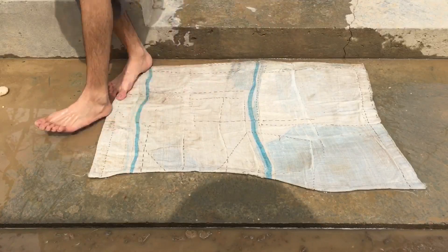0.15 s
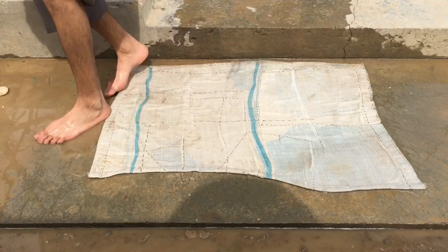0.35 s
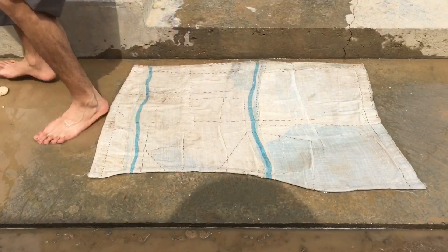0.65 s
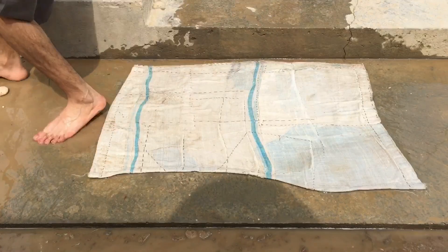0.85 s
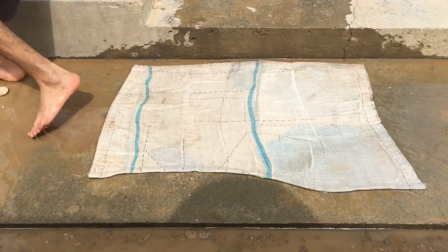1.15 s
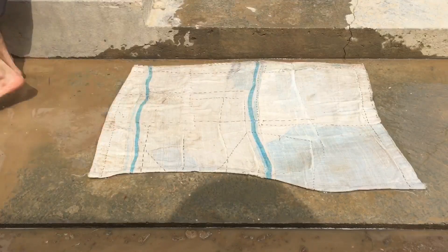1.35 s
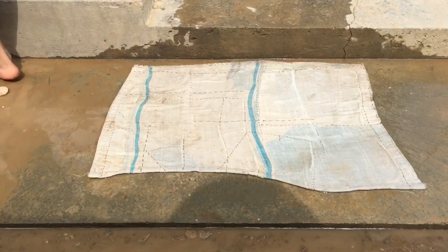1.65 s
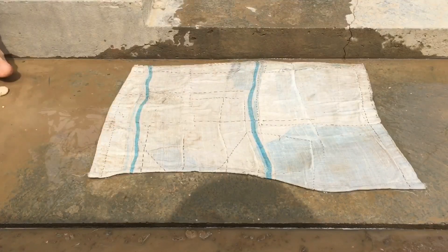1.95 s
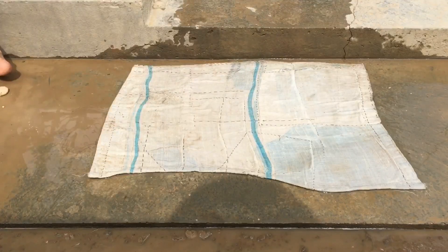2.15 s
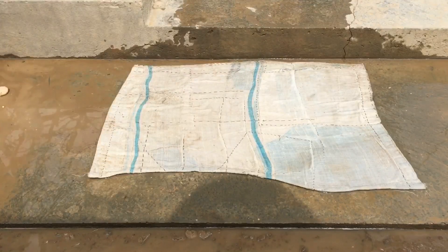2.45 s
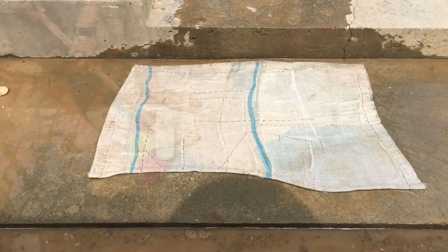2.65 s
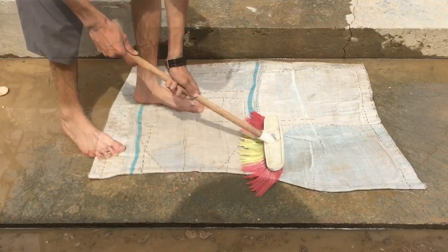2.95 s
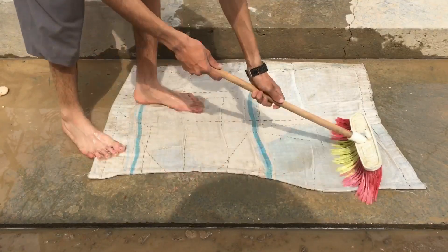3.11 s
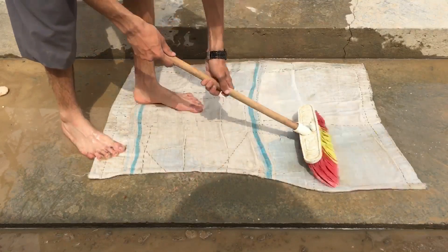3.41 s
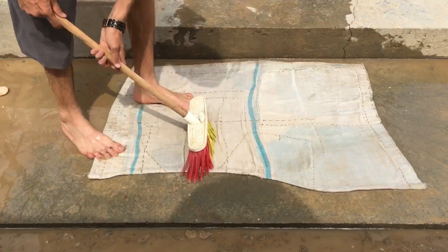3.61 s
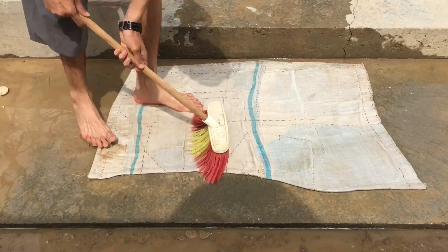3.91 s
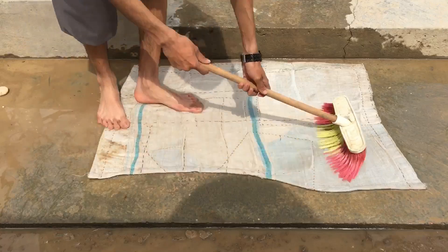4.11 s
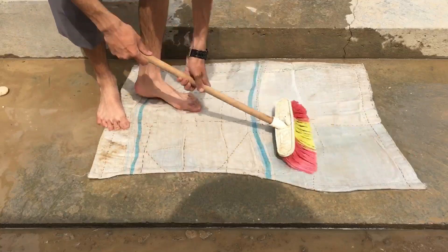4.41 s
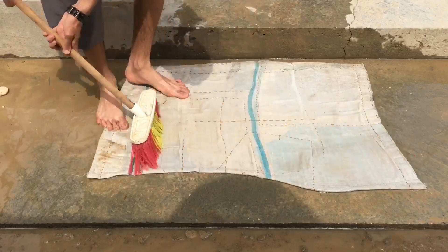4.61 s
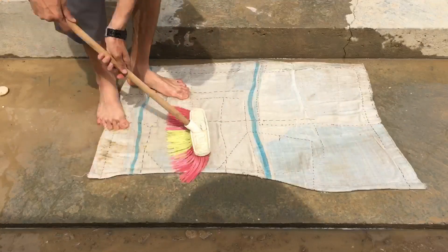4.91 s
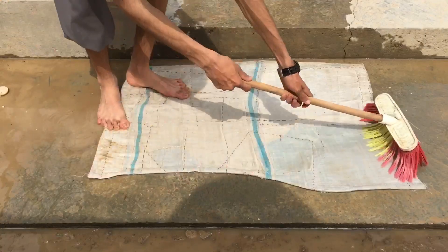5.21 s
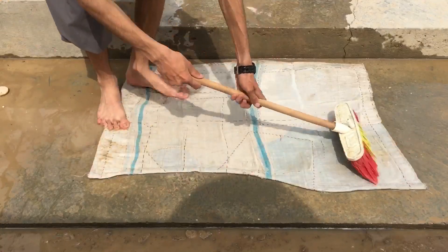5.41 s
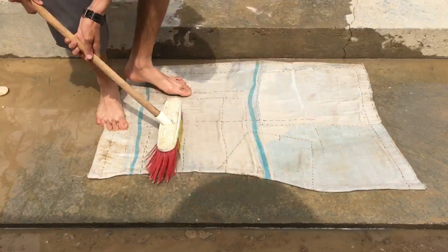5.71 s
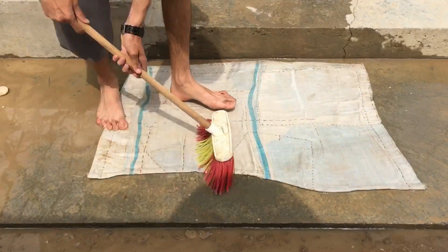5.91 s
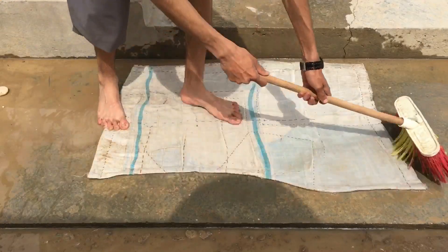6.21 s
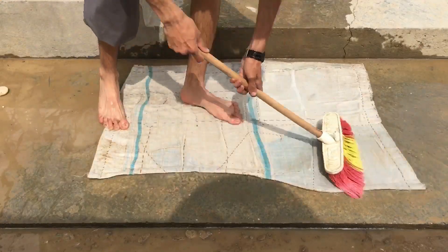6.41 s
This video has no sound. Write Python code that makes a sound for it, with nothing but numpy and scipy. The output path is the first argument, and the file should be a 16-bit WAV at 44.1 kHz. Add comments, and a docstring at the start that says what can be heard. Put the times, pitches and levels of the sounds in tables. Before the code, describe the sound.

Bare soles brush a wet floor, a wooden handle clacks, hollow plastic knocks, then a stiff broom scrubs a wet rug in steady strokes.

```python
"""A stiff broom scrubs a soapy rug on concrete, about two strokes a second: shaped grains and sliding noise bands.
Before it, bare soles brush the wet floor (soft grains), a broom handle clacks, a dull thud comes and a plastic
bucket is knocked (damped modes plus noise cracks), and drops fall back (rising sines). Light taps, mostly hollow,
are scattered throughout; wet ticks come until about 4.1 s. A breeze puffs on the microphone (low noise, pulses);
a far bird calls (fluttered sine) over a neighbourhood hum (filtered noise). Walls add a short tail and an echo."""
import sys
import numpy as np
from scipy import signal
from scipy.fft import rfft, irfft, next_fast_len
from scipy.io import wavfile
from scipy.ndimage import uniform_filter1d, map_coordinates

SR = 44100
rng = np.random.default_rng(int(sys.argv[2]) if len(sys.argv) > 2 else 0)


def dump_mix(stems):
    """Bounce the given channels to the path in sys.argv[1] as a 16-bit WAV at rate SR."""
    frames = np.atleast_2d(stems).T  # one column per channel
    limited = np.clip(frames, -1, 1)  # hard clip at full scale
    pcm = np.round(limited * 32767).astype(np.int16)
    wavfile.write(sys.argv[1], SR, pcm)


N = 289296
TIME_S = np.arange(N) / SR

# Spectrum of wet contact with the floor. Each row: frequency in Hz, relative level in dB.
WET_SPECTRUM = [(300, -1), (1800, 12.5), (3500, 7), (6000, 4), (15000, -6.5)]


def amp(db):
    """Decibels to gain."""
    return 10 ** (np.asarray(db) / 20)


def unit(x):
    """Scale to rms 1."""
    return x / np.sqrt(np.mean(x ** 2) + 1e-20)


def along(points, hz):
    """(Hz, value) points read on a log axis."""
    point_hz, values = np.transpose(points)
    return np.interp(np.log(hz + 1), np.log(point_hz), values)


def wobble(knots_per_s):
    """Smooth random curve through normally distributed knots."""
    knots = rng.standard_normal(int(N * knots_per_s / SR) + 4)
    return map_coordinates(knots, [np.arange(N) * knots_per_s / SR])


def filtered(x, response):
    """x times a response of frequency, zero-padded against wrap-around."""
    size = next_fast_len(len(x) + SR // 4)
    spectrum = rfft(x, size) * response(np.fft.rfftfreq(size, 1 / SR))
    return irfft(spectrum, size)[:len(x)]


def coloured(x, spectrum):
    """x shaped by (Hz, dB) points, at rms 1."""
    return unit(filtered(x, lambda hz: amp(along(spectrum, hz))))


def softened(x, edge_hz):
    """Causal low-pass, as from a soft contact."""
    return signal.lfilter(*signal.butter(2, min(edge_hz, SR / 2 - 1), fs=SR), x)


def grains(rate_per_s, spread_db):
    """Random impulses of uneven size, at rms 1."""
    hits = rng.random(N) < rate_per_s / SR
    sizes = rng.standard_normal(N) * amp(spread_db * rng.standard_normal(N))
    return unit(hits * sizes)


def patchy(x, depth_db, bins):
    """Random gain patches, some bins wide and about 30 ms long, at rms 1."""
    z = signal.stft(x, nperseg=256)[2]
    field = uniform_filter1d(rng.standard_normal(z.shape), bins, 0)
    field = uniform_filter1d(field, 10, 1)
    gain = amp(depth_db * unit(field))
    return unit(signal.istft(z * gain, nperseg=256)[1][:N])


def ring(modes, scatter_db):
    """Sum of damped modes, struck at slightly new strengths each time."""
    t = np.arange(SR // 4) / SR
    out = np.zeros(len(t))
    for k, (hz, db, t60_s) in enumerate(modes):
        level_db = db + scatter_db * rng.standard_normal() - 60 * t / t60_s
        out += (-1) ** k * amp(level_db) * np.sin(2 * np.pi * hz * t)
    return out


def burst(spectrum, t60_s):
    """Coloured noise under an exponential decay."""
    t = np.arange(SR // 4) / SR
    return coloured(rng.standard_normal(len(t)), spectrum) * amp(-60 * t / t60_s)


def add(track, start_s, sound):
    """Mix a sound into the track in place."""
    part = track[round(start_s * SR):][:len(sound)]
    part += sound[:len(part)]


def blows(rows, modes, crack_spectrum):
    """Each blow rings the modes and cracks at the contact, low-passed at its own brightness."""
    out = np.zeros(N)
    for start_s, ring_db, crack_db, crack_t60_s, contact_hz in rows:
        body = amp(ring_db) * ring(modes, scatter_db=1.5)
        crack = amp(crack_db) * burst(crack_spectrum, crack_t60_s)
        add(out, start_s, softened(body + crack, contact_hz))
    return out


def neighbourhood():
    """A distant wash of patchy filtered noise, its level drifting slowly."""
    # Far hum. Each row: frequency in Hz, relative level in dB.
    hum_spectrum = [(100, -7.5), (170, -8), (290, -7), (420, -10.5), (650, -8), (1050, -12.5), (1600, -18),
                    (2300, -24), (5000, -35), (15800, -39.5)]
    # Level of the hum. Each row: time in seconds, level in dB before the waver.
    hum_level = [(0, -57), (1, -59.5), (2.1, -59), (2.7, -65.5), (6.5, -61)]
    level_db = np.interp(TIME_S, *np.transpose(hum_level))
    waver_db = 0.7 * wobble(9)
    hum = coloured(rng.standard_normal(N), hum_spectrum)
    return amp(level_db + waver_db) * patchy(hum, depth_db=2.0, bins=3)


def breeze():
    """Small eddies bump the microphone, strongest in gusts; single eddies push and pull the pressure once."""
    # Gusts. Each row: start in seconds, length in seconds, level in dB before the lumps.
    gust_rows = [(1.02, 0.025, -44.5), (1.453, 0.064, -43.5), (1.75, 0.25, -41.5), (2.143, 0.215, -45),
                 (2.464, 0.16, -46.5), (2.868, 0.062, -45), (3.503, 0.18, -47), (4.144, 0.043, -37),
                 (4.238, 0.077, -34.5), (4.366, 0.23, -40.5), (4.692, 0.092, -33.5), (5.078, 0.15, -46.5),
                 (5.417, 0.29, -46), (5.915, 0.18, -47)]
    # Single eddies. Each row: start in seconds, relative level in dB, half width in seconds.
    puff_rows = [(1.45, -34.5, 0.0028), (1.792, -32, 0.0036), (4.263, -36, 0.0033), (4.5076, -19.5, 0.0024),
                 (4.752, -24.5, 0.0029), (5.197, -34, 0.0013)]
    # Wind on the microphone. Each row: frequency in Hz, relative level in dB.
    rumble_spectrum = [(25, -18.5), (48, 4.5), (72, -0.5), (120, -6), (200, -13.5), (350, -33), (600, -68)]
    calm_db, attack_s, release_s = -56, 0.012, 0.01

    strength = amp(calm_db + 2.45 * wobble(12))
    for start_s, length_s, db in gust_rows:
        attack = np.clip((TIME_S - start_s) / attack_s, 0, 1)
        release = np.exp(-np.maximum(TIME_S - start_s - length_s, 0) / release_s)
        strength = np.hypot(strength, amp(db) * attack * release)
    eddies = grains(rate_per_s=220, spread_db=1) + amp(-4.5) * rng.standard_normal(N)
    lumps_db = 1.5 * wobble(25)
    out = strength * amp(lumps_db) * coloured(eddies, rumble_spectrum)

    for start_s, db, half_s in puff_rows:
        u = (TIME_S[:SR // 10] - 0.008) / half_s  # centred 8 ms after the start
        add(out, start_s, amp(db + 9.0) * -u / (1 + u ** 2) ** 2)
    # the microphone sheds the slowest pressure changes
    return signal.lfilter(*signal.butter(2, 28, "high", fs=SR), out)


def taps():
    """Light hollow taps, and a bristle snap at 4.084 s given the same sound: damped modes with a noise burst."""
    # Taps and the snap. Each row: start in seconds, relative level in dB.
    tap_rows = [(0.151, -51), (0.457, -51), (2.765, -46.5), (4.084, -45), (5.2345, -40.5), (5.563, -41.5),
                (5.8083, -40), (5.9692, -42), (6.128, -41), (6.2875, -43.5), (6.4472, -45)]
    # Hollow modes. Each row: frequency in Hz, relative level in dB, t60 in seconds.
    tap_modes = [(1088, 6.5, 0.054), (1220, 2.5, 0.035), (1330, -4, 0.019), (1604, -3, 0.045)]
    knock_spectrum = [(800, -19), (1150, 10.5), (2200, -5), (6000, -13), (15000, -25)]
    out = np.zeros(N)
    for start_s, db in tap_rows:
        sound = ring(tap_modes, scatter_db=2) + burst(knock_spectrum, t60_s=0.076)
        add(out, start_s, amp(db - 7.0) * sound)
    return out


def feet():
    """Bare soles peel off the wet floor: dense grains in soft swells, a faint sizzle."""
    # Brushes of wet soles. Each row: middle in seconds, half length in seconds, level in dB.
    scuff_rows = [(0.323, 0.087, -68.5), (1.36, .05, -65.5)]
    strength = np.zeros(N)
    for middle_s, half_s, db in scuff_rows:
        strength += amp(db) * np.exp(-((TIME_S - middle_s) / half_s) ** 2)
    return strength * coloured(grains(rate_per_s=4600, spread_db=5.0), WET_SPECTRUM)


def ticks():
    """Wet ticks of soles, cloth and bristles: short noise bursts."""
    # Ticks. Each row: start in seconds, relative level in dB.
    tick_rows = [(0.271, -44), (0.296, -46), (0.822, -52), (1.706, -44.5), (1.727, -42), (2.581, -41.5),
                 (3.318, -71), (4.146, -32.5)]
    out = np.zeros(N)
    for start_s, db in tick_rows:
        add(out, start_s, amp(db - 9.5) * burst(WET_SPECTRUM, t60_s=0.048))
    return out


def bird():
    """A far beaded whistle: a fluttered sine with a weak octave, swelling and fading as its pitch arches."""
    # Slurred call. Each row: start in seconds, length in seconds, top pitch in Hz, level in dB before the swell.
    call_rows = [(.4, .52, 1506, -59)]
    slur_share, slur_top = 0.44, 0.46  # curvature of the arch; position of its top within the call
    out = np.zeros(N)
    for start_s, length_s, top_hz, db in call_rows:
        u = np.clip((TIME_S - start_s) / length_s, 0, 1)
        pitch_hz = top_hz * (1 - slur_share * (u - slur_top) ** 2)
        phase = 2 * np.pi * np.cumsum(pitch_hz * (1 + 0.02 * wobble(170))) / SR
        whistle = unit(np.sin(phase) + amp(-19.5) * np.sin(2 * phase))
        out += amp(db) * np.sin(np.pi * u) ** 2 * whistle
    flutter = 1 + 0.5 * np.sin(2 * np.pi * 24 * TIME_S + wobble(20))
    return flutter * out


def handle():
    """Wood clacks on wet concrete: a light double touch, then a hard blow with a snap and a little spray."""
    # Handle strikes. Each row: start in seconds, ring gain in dB, crack gain in dB, crack t60 in seconds,
    # contact low-pass in Hz.
    clack_rows = [(1.0214, -38.5, -36.5, 0.037, 2260), (1.0295, -40, -30, 0.038, 980),
                  (1.0784, -26, -20.5, 0.038, 14000)]
    # Modes of the wooden handle. Each row: frequency in Hz, relative level in dB, t60 in seconds.
    wood_modes = [(364, -2.5, 0.044), (573, -1.5, 0.037), (870, 2.5, 0.028), (1020, -3, 0.092),
                  (1330, -3, 0.022), (1437, -24.5, 0.6), (1725, 8.5, 0.02), (2743, -5.5, 0.013),
                  (3240, 3.5, 0.033), (3860, 4.5, 0.022), (5220, -2, 0.022), (6200, -7, 0.015),
                  (7900, -3, 0.026), (9180, -1.5, 0.018)]
    # Spray off the wet floor. Each row: frequency in Hz, relative level in dB.
    spray_spectrum = [(300, -25.5), (1000, 2), (1600, -12), (3000, -19), (6000, 1), (9500, -4.5),
                      (15000, -9.5)]
    crack_spectrum = [(100, -1.5), (900, -0.5), (2300, -4.0), (3400, -2.5), (5000, -10.5), (12000, -8),
                      (16000, -14)]
    snap_spectrum = [(500, -6.5), (3000, -8.5), (15000, -7.5)]
    out = blows(clack_rows, wood_modes, crack_spectrum)
    hard_s = clack_rows[-1][0]
    add(out, hard_s, amp(-8.5) * burst(snap_spectrum, t60_s=0.0055))
    add(out, hard_s, amp(-51) * burst(spray_spectrum, t60_s=0.26))
    return out


def drips():
    """Drops fall back after the hard clack; each traps a bubble that rings briefly with a rising pitch."""
    # Drops. Each row: start in seconds, first pitch in Hz, level in dB before the attack and decay.
    drip_rows = [(1.189, 1690, -35), (1.211, 5940, -49.5)]
    t60_s, rise_per_s = 0.024, 14  # pitch climbs by 14 times its first value a second
    t = np.arange(SR // 10) / SR
    attack = 1 - np.exp(-t / 0.002)
    out = np.zeros(N)
    for start_s, hz, db in drip_rows:
        phase = 2 * np.pi * hz * t * (1 + rise_per_s * t / 2)
        add(out, start_s, amp(db - 60 * t / t60_s) * attack * np.sin(phase))
    return out


def thud_and_bucket():
    """A dull thud, perhaps a footfall, then a strong hollow plastic knock and a faint rebound."""
    # Thud, knock and rebound. Each row: start in seconds, ring gain in dB, crack gain in dB,
    # crack t60 in seconds, contact low-pass in Hz.
    knock_rows = [(1.8948, -54, -32.5, 0.09, 3250), (2.1858, -16.5, -23.5, 0.078, 2530),
                  (2.249, -55, -33.5, 0.087, 2380)]
    # Modes of the hollow bucket. Each row: frequency in Hz, relative level in dB, t60 in seconds.
    bucket_modes = [(169.3, -10.5, 0.083), (355, -15.5, 0.085), (615, -0.5, 0.07), (920, -7, 0.063),
                    (1150, 4.5, 0.016), (1410, 1, 0.035), (1524, -8, 0.045), (1720, 2.5, 0.02),
                    (2050, -16, 0.06), (2590, -11.5, 0.022), (3330, -1, 0.014), (4260, -5, 0.013),
                    (5700, -2.5, 0.0089)]
    crack_spectrum = [(100, 1), (300, 10.5), (1400, 3), (2200, -8), (3200, -13), (6000, -7), (14000, -11)]
    return blows(knock_rows, bucket_modes, crack_spectrum)


def stroke_strengths():
    """Hiss and scrape gains: the head speeds up and slows in a half sine, pressed hardest once a stroke."""
    # Strokes, laid on and then pushed and pulled in turn. Each row: start in seconds, length in seconds,
    # bristle hiss gain in dB, weave scrape gain in dB, moment of hardest pressure in seconds.
    stroke_rows = [(2.684, 0.3, -58.5, -60, 2.76), (2.81, 0.55, -52.5, -55, 3.0),
                   (3.328, 0.51, -49.5, -55, 3.53), (3.858, 0.44, -47, -56, 4.08),
                   (4.322, 0.47, -45.5, -54.5, 4.52), (4.822, 0.46, -46.5, -49.5, 5.03),
                   (5.354, 0.43, -47, -56.5, 5.53), (5.842, 0.41, -48, -53.5, 6.05),
                   (6.269, 0.4, -47, -58, 6.44)]
    hiss_power, scrape_power = 1.37, 0.33  # exponents of speed
    full_bend = 1.355  # the hiss levels off as the bristles reach full bend
    press_s, press_db = 0.14, 17  # width of the press; scrape lost away from it
    turn_hiss_db, turn_scrape_db = -70.5, -78.5  # bristles still stir while the head turns round

    on_rug = np.clip((TIME_S - stroke_rows[0][0]) / stroke_rows[0][1], 0, 1)
    hiss = amp(turn_hiss_db) * on_rug
    scrape = amp(turn_scrape_db) * on_rug
    for start_s, length_s, hiss_db, scrape_db, hardest_s in stroke_rows:
        speed = np.abs(np.sin(np.pi * np.clip((TIME_S - start_s) / length_s, 0, 1)))
        eased = 1 - np.exp(-((TIME_S - hardest_s) / press_s) ** 2)
        hiss = np.hypot(hiss, amp(hiss_db) * np.tanh(full_bend * speed ** hiss_power))
        scrape = np.hypot(scrape, amp(scrape_db - press_db * eased) * speed ** scrape_power)
    return hiss, scrape


def snag_strength():
    """Scrape gain of tufts that snag on the weave and spring free: a quick rise and slower fall."""
    # Snags. Each row: start in seconds, relative level in dB.
    snag_rows = [(3.109, -54), (3.633, -51), (3.696, -47.5), (3.903, -49), (4.0844, -51), (4.6204, -40),
                 (4.7525, -48), (5.6997, -48), (6.352, -46)]
    rise_s, trim_db = 0.006, -4
    u = np.arange(SR // 8) / SR / rise_s
    out = np.zeros(N)
    for start_s, db in snag_rows:
        add(out, start_s, amp(db + trim_db) * u * np.exp(1 - u))
    return out


def broom():
    """Bristle tips flick through the wet pile, shafts swish, and tufts catch and slip on the weave."""
    # Bristle tips in the wet pile. Each row: frequency in Hz, relative level in dB.
    tip_spectrum = [(1200, -15), (2400, -15), (3600, -4), (4700, -6), (5600, -2), (7600, -3), (9200, -0.5),
                    (10400, -6.5), (11600, -4), (15800, -8)]
    # Bending bristle shafts. Each row: frequency in Hz, relative level in dB.
    shaft_spectrum = [(1500, -17), (2300, 2), (2700, -12.5), (3600, -2), (4800, -10), (6200, -3.5),
                      (9000, -14.5)]
    # Tufts on the weave. Each row: frequency in Hz, relative level in dB.
    weave_spectrum = [(400, -52), (900, -6), (1300, -3), (1600, 2.5), (2250, -4), (2600, -7.5),
                      (3400, -7.5), (5500, -10.5), (9000, -32.5)]
    grit_spectrum = [(700, -17), (1500, -3), (4500, 0.5), (9000, -10.5)]

    hiss, scrape = stroke_strengths()
    swish = np.sqrt(hiss * scrape)  # the shafts need both speed and pressure
    tips = patchy(coloured(grains(24000, spread_db=1.5), tip_spectrum), depth_db=0.1, bins=7)
    shafts = patchy(coloured(grains(5000, spread_db=2), shaft_spectrum), depth_db=5.0, bins=3)
    weave = patchy(coloured(grains(2000, spread_db=1.5), weave_spectrum), depth_db=3.0, bins=4)
    flicks = coloured(grains(340, spread_db=1.5), tip_spectrum)  # single stiff bristles snap straight
    grit = coloured(grains(420, spread_db=2), grit_spectrum)  # sand crunches under the tufts

    hiss_part = hiss * (amp(2.5 * wobble(40)) * tips + amp(-11.5) * flicks + amp(-12.5) * grit)
    swish_part = swish * amp(-0.5 + 2.1 * wobble(43)) * shafts
    scrape_part = np.hypot(scrape, snag_strength()) * amp(1.3 * wobble(110)) * weave
    return hiss_part + swish_part + scrape_part


def rasps():
    """Bent bristles sing as they are dragged: narrow noise bands sliding in pitch with the bend."""
    # Rasps. Each row: start in seconds, length in seconds, first centre in Hz, last centre in Hz,
    # level in dB before the swell.
    rasp_rows = [(3.4, 0.26, 4300, 3400, -55), (5.593, 0.18, 3750, 2150, -58.5),
                 (5.927, 0.054, 4210, 3600, -58)]
    knots_per_s = 1100  # sets the bandwidth
    out = np.zeros(N)
    for start_s, length_s, first_hz, last_hz, db in rasp_rows:
        u = np.clip((TIME_S - start_s) / length_s, 0, 1)
        phase = 2 * np.pi * np.cumsum(first_hz + (last_hz - first_hz) * u) / SR
        band = wobble(knots_per_s) * np.sin(phase) + wobble(knots_per_s) * np.cos(phase)
        out += amp(db) * np.sin(np.pi * u) * band
    return out


def yard(x, tail_db, echo_db):
    """Near walls scatter a short tail; a farther wall sends back one dull echo."""
    # Decay of the near walls. Each row: frequency in Hz, t60 in seconds.
    wall_decay = [(150, 0.64), (1500, 0.35), (4000, 0.38), (15000, 0.14)]
    tail_spectrum = [(800, -3.0), (1500, -2.0), (2300, -2), (3400, -9), (14000, -5)]
    echo_s = 0.0715

    hz, t, z = signal.stft(rng.standard_normal(SR // 2), SR, nperseg=256)
    decay = amp(-60 * t / along(wall_decay, hz)[:, None])
    tail = signal.istft(z * decay, SR, nperseg=256)[1]
    tail = filtered(tail, lambda f: amp(along(tail_spectrum, f)))
    delayed_tail = np.pad(tail, (SR // 200, 0))  # 5 ms
    wash = signal.fftconvolve(x, delayed_tail / np.linalg.norm(tail))[:N]
    echo = filtered(softened(x, edge_hz=1470), lambda f: np.exp(-2j * np.pi * f * echo_s))
    return x + amp(tail_db) * wash + amp(echo_db) * echo


def scene():
    """Near sounds through the yard's walls, plus bird, hum and wind, at one microphone."""
    near = taps() + feet() + ticks() + handle() + drips() + thud_and_bucket() + broom() + rasps()
    far = neighbourhood() + bird()
    return (yard(near, tail_db=-17.0, echo_db=-16.0) + far + breeze())[None]


def record(dry):
    """The recorder adds a faint low-passed hiss and rolls off steeply at its band limit."""
    top_hz, order = 15850, 120
    noisy = dry + amp(-69) * softened(rng.standard_normal(N), edge_hz=7100)
    return np.array([filtered(channel, lambda hz: 1 / (1 + (hz / top_hz) ** order)) for channel in noisy])


dry = scene()
out = record(dry)
dump_mix(out)
```